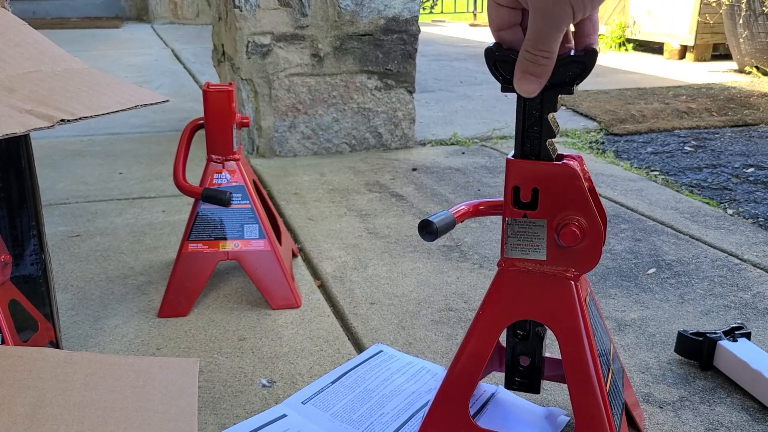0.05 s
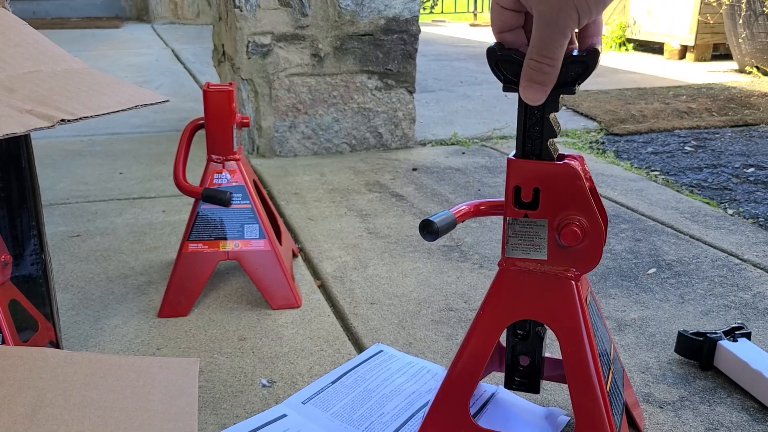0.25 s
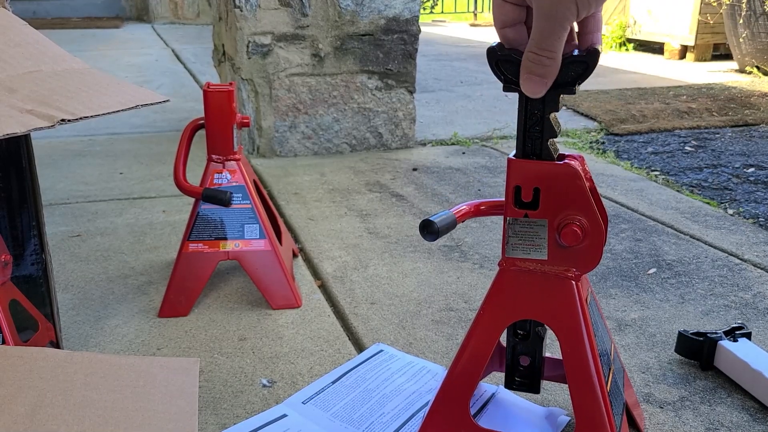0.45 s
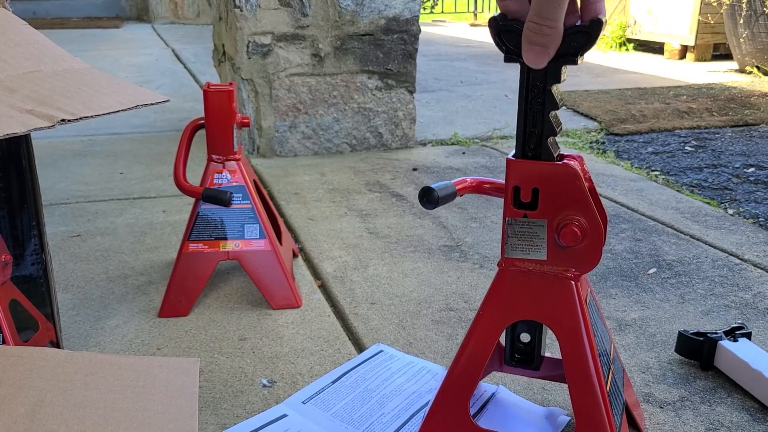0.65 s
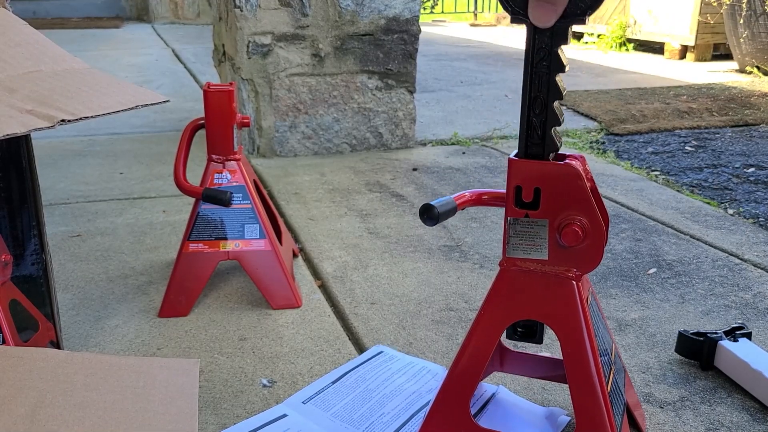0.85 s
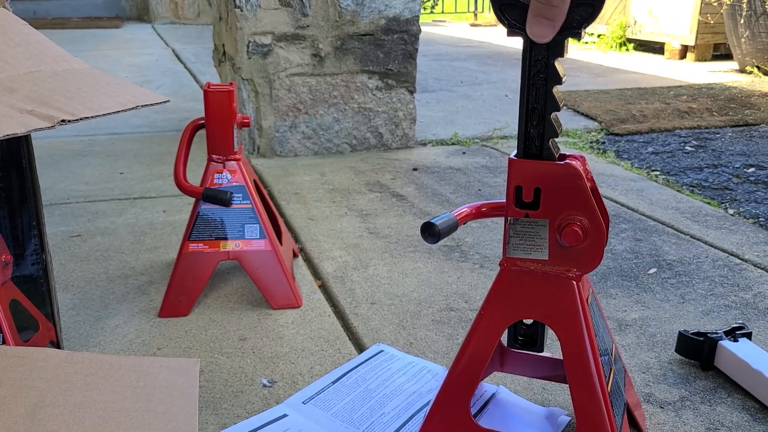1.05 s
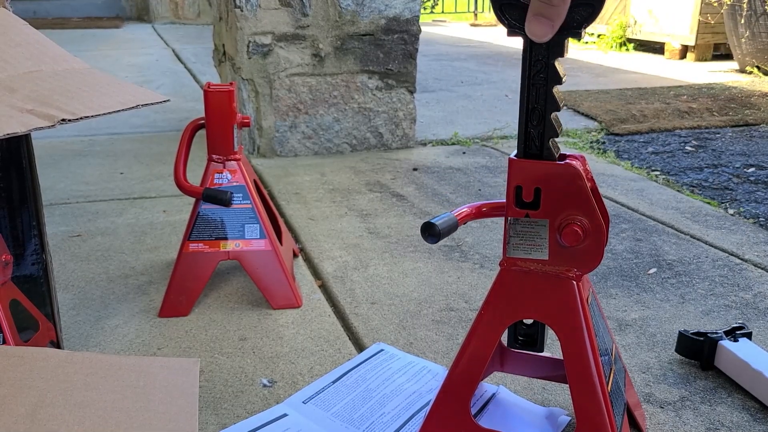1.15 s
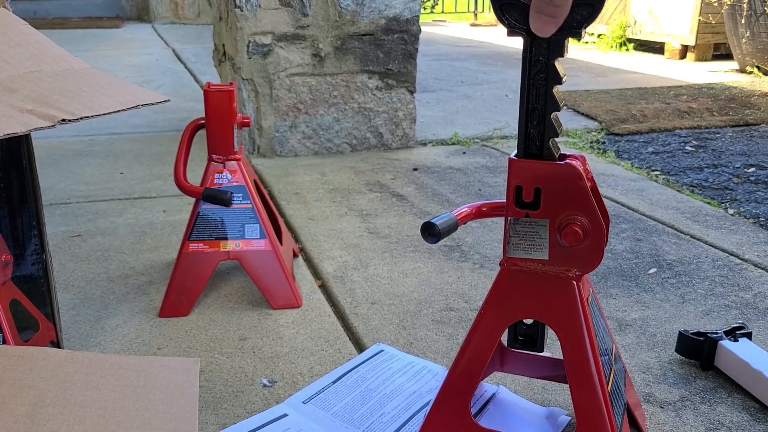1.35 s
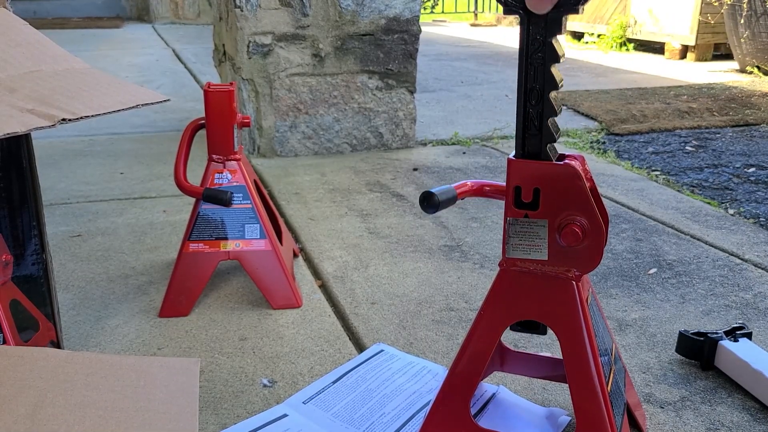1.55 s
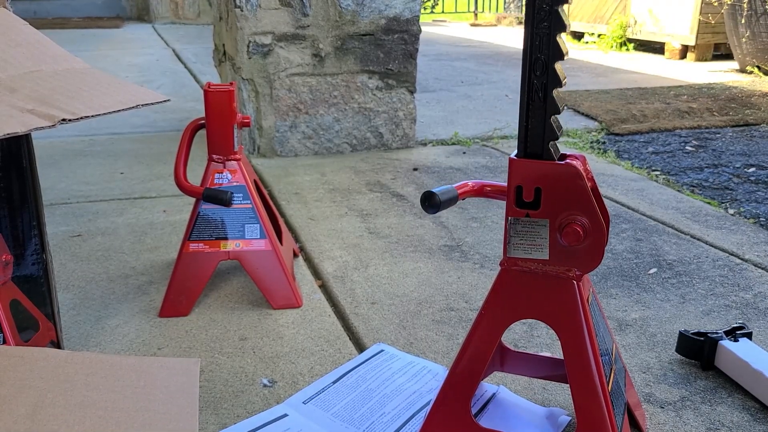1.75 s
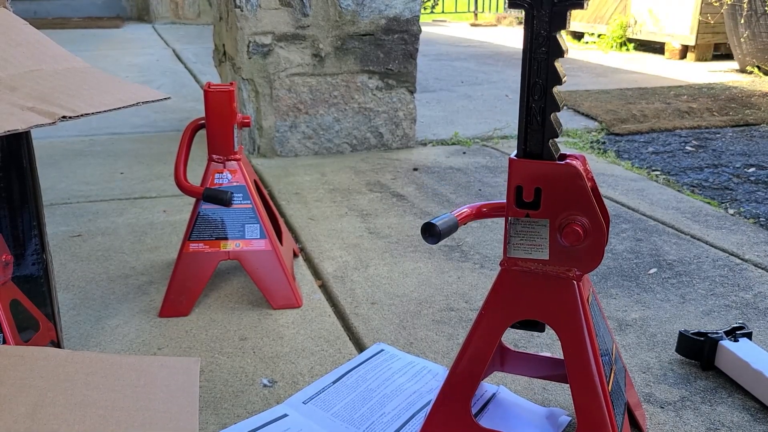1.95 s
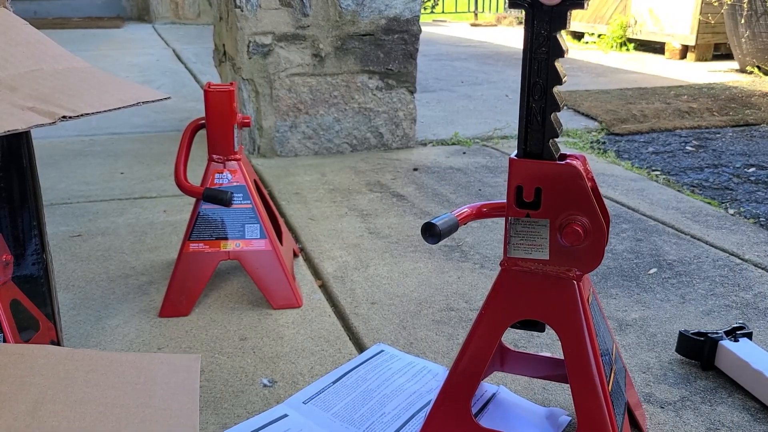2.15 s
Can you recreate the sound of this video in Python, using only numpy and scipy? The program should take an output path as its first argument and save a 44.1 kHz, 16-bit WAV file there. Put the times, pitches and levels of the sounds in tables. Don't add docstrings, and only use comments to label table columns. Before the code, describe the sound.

A steel jack stand's latch scrapes and clatters over teeth, drops with a bright clank, pauses, then clinks twice more, the last ringing out. Close phone microphone outdoors, with low wind rumble and faint distant traffic.

```python
import sys
import numpy as np
from scipy import signal
from scipy.fft import rfft, irfft
from scipy.io import wavfile
from scipy.ndimage import uniform_filter1d

SR = 44100
rng = np.random.default_rng(int(sys.argv[2]) if len(sys.argv) > 2 else 0)


def store_wav(level_fs):
    pcm = np.round(np.clip(np.atleast_2d(level_fs), -1, 1) * 32767)
    wavfile.write(sys.argv[1], SR, pcm.T.astype(np.int16))


def invert_db(x):
    u = np.asarray(x, float) / 20
    return 10 ** u


N = 97108

# start in seconds, handle
# level in dB, post level in dB, frame level in dB, bright edge level in dB.
KNOCKS = [(.500, -37, -42, -49.5, -87), (.527, -33, -65, -67, -85), (.552, -25, -32.5, -47.5, -88),
          (.591, -34, -32, -40, -62), (.612, -28.5, -51, -39, -61), (.657, -29, -57, -53, -76),
          (.689, -21.5, -18, -24, -48), (.720, -42, -23, -42, -51), (.756, -28.5, -28, -42, -75),
          (.783, -35, -16, -18.5, -36), (.800, -34, -15.5, -45, -50), (.892, -31, -31, -26, -55),
          (.897, -10.5, -22, -15.5, -43.5), (.963, -29.5, -74.5, -59, -89), (1.470, -39, -64, -59, -87.5),
          (1.483, -26, -50, -65, -89), (1.510, -24, -32.5, -44, -72), (1.545, -24, -44, -58, -73),
          (1.562, -51, -27, -36, -80), (1.6115, -22.5, -7, -20.5, -30.5), (1.695, -35, -48, -54, -77),
          (1.795, -61.5, -45.5, -42, -83), (1.817, -7.5, -13, -10, -26)]
LEFTOVER_S, LEFTOVER_DB = -0.11, (-13.5, -41, -13.5, -39)
# start in seconds, level in dB.
PAWL_TAPS = [
    (.503, -47.5),
    (0.612, -39),
    (0.696, -28),
    (0.786, -34),
    (0.895, -25.5),
    (1.561, -24.5),
    (1.615, -23),
    (1.818, -21.5),
]
# start in seconds, level in dB.
SEATINGS = [
    (-.09, -39),
    (.897, -36.5),
    (1.613, -37),
    (1.817, -20.5),
]
# start in seconds, level in dB.
ROCKS = [
    (0.549, -29.5),
    (0.609, -31.5),
    (.69, -34.5),
    (1.557, -24),
    (1.581, -30),
    (1.635, -24.5),
]
# start in seconds, level in dB.
HANDLE_BOUNCES = [
    (.703, -32),
    (.789, -17.5),
    (1.624, -20.5),
    (1.828, -16.5),
    (1.868, -33.5),
]
# start in seconds, level in dB.
TOOTH_TICKS = [(.553, -44.5), (.592, -40), (.618, -43), (.664, -36.5), (0.689, -29), (0.723, -27),
               (0.783, -23.5), (0.8, -15), (.899, -16), (1.512, -48), (1.561, -28), (1.6155, -9.5),
               (1.626, -17), (1.818, -10), (1.828, -19.5)]
PIN_TICKS = [(0.502, -52), (.553, -49), (.592, -44), (.615, -42), (.691, -30), (0.783, -27.5),
             (.899, -26.5), (1.507, -40.5), (1.614, -28), (1.818, -16.5), (1.832, -20.5)]

HANDLE_HZ = [829, 862, 889]
POST_HZ = [1066, 2320, 2468, 2500, 2732, 2830, 3752, 3995, 4334]
PAWL_HZ = [1662, 2056, 2172, 3098, 3140]
FRAME_HZ = [1744, 2266, 2815, 3174, 3300, 3354, 4221, 5100]
EDGE_HZ = [4651, 4743, 5669, 5809, 6029, 6562, 7084, 7700, 8640, 9172, 9354, 10420, 10670, 13880]
LEGS_HZ = [1997.5, 3541, 5812, 6390, 7434]
TOOTH_HZ = [2836, 5469]
PIN_HZ = [3655, 3754, 4511, 4904]
# level in dB, time to decay by 60 dB (T60) in seconds.
HANDLE = [(-6, 0.072), (-10, 0.23), (-6, 0.2)]
POST = [(-22.5, 0.16), (-45, 0.15), (-19, 0.21), (-28.5, 0.18), (-2.5, 0.16), (-18, 0.21), (-11, 0.13),
        (-37.5, 0.063), (-25, 0.22)]
PAWL = [(1, 0.2), (-15, 0.34), (-5.5, 0.039), (-9, 0.062), (-8, 0.057)]
FRAME = [(-9, 0.16), (-20, 0.22), (-2, 0.12), (-5.5, 0.17), (-10, 0.1), (-5, 0.14), (-26, 0.29),
         (-10, 0.041)]
EDGE = [(-10.5, .25), (-12, 0.26), (-9, 0.18), (-3.5, .28), (-7.5, 0.17), (-15, 0.27), (-9.5, 0.26),
        (-7, .17), (-13, 0.18), (-13.5, .11), (-13.5, .17), (-24, .15), (-22, 0.13), (-25, .12)]
LEGS = [(-1, 0.3829), (-6.5, 0.32), (-23.5, 0.52), (-38, 0.9), (-21, 0.29)]
TOOTH = [(4, .13), (-26, 0.076)]
PIN = [(-1, 0.11), (2, 0.11), (-9, 0.1), (-12.5, 0.25)]
# frequency in Hz, level in dB, T60 in seconds.
SHEET = [(458.1, -43.5, 0.048), (707, -25, 0.09), (1400, -13.5, 0.11), (2830, -8, 0.16), (4891, -22, 0.086)]
RIM = [(4010, -4, 0.19), (5900, -6.5, 0.17), (9000, -20.5, 0.17), (11000, -18, 0.23), (13300, -28, 0.19),
       (16100, -36, .07)]
HUM = [(835, -14, .12), (887.6, 0, .2)]
# low edge in Hz, high edge in Hz, level in dB, T60 in seconds.
THUD = (270, 610, 1.1, 0.11)
CLACK = (902.5, 5000.5, -4, 0.1038)
CRACK = (5200, 8200, -4, 0.014)
SPRAY = (4508.5, 14010, -14.5, 0.0932)
ROCK = (78, 560.5, 5.5, 0.09)

# time in seconds, level in dB.
DRAG = [(.45, -110), (.5, -69), (.6, -63.5), (.7, -48), (.82, -60), (.88, -65), (.98, -73.5), (1.04, -110),
        (1.43, -110), (1.49, -60.5), (1.6, -51.5), (1.68, -54), (1.76, -85), (1.8, -49.5), (1.86, -110)]
RUB = [(.47, -76), (.51, -45), (.62, -42), (.76, -42), (.84, -63), (1.0, -77), (1.44, -85), (1.48, -53),
       (1.55, -40.5), (1.6, -52), (1.72, -48.5), (1.78, -82)]
# handle, post, pawl, frame, edge, sheet, rim levels in dB.
DRAG_MIX_DB = (-0.5, -7.5, -8, -23, -23.5, -4.5, -34.5)
# frequency in Hz, difference in dB.
STEEL_PAN = [(300, -5), (600, -2), (880, 7), (1100, -5), (1900, -5), (2500, 1), (8000, 0), (15000, 2)]
# frequency in Hz, lead in radians.
STEEL_LEAD = [(300, .2), (880, .35), (1200, 1.1), (2800, 1.3), (4500, 1.5), (15000, 1.6)]

# frequency in Hz, density in dB per Hz.
TOWN = [(120, -40), (200, -8.5), (254, -6), (282, -2.5), (297, -12.5), (404, -12.5), (873, -14.5),
        (1290, -13), (3500, -30.5), (6500, -52), (12000, -60.5), (15600, -89), (22000, -120)]
WIND = [(11, -16.5), (18, -2.5), (47, 2.5), (70, 8), (98, 1.5), (161, -8.5), (300, -17.5), (390, -53.5),
        (660, -120)]
# time in seconds, level in dB.
TOWN_LEVEL = [(0.0, -55.5), (0.52, -53.5), (0.77, -45), (1.09, -53), (1.84, -56), (2.2, -59.5)]
GUST = [(0.08, -40.5), (0.41, -50.5), (0.5, -38.5), (0.63, -50.5), (0.65, -38), (0.93, -39.5),
        (0.96, -31.5), (1.13, -51.5), (1.18, -38.5), (1.21, -41.5), (1.5, -41), (1.51, -44), (1.63, -29),
        (1.74, -41.5), (1.83, -36.5), (2.17, -36)]

RING = 14000
RISE_CYCLES, PUSH_S = 1.5, 0.0022
SCATTER_DB, SWAY = 2, 0.59
FREE_S, MUFFLED_T60_S = 0.033, 0.085
CHATTER_S = 0.0017
THUD_PAN_DB, THUD_SIDE = -3.5, .3
ECHO_DB, ECHO_T60_S = -20, 0.3
TOWN_LIFT_DB, TOWN_SIDE_DB = 0.5, -2
WIND_SIDE_DB, FLUTTER_DB = -1.5, 2.5
CHIRP_S, CHIRP_LEN_S, CHIRP_HZ, CHIRP_DB = 1.16, .042, 2650, -56
TOP_HZ, CEILING, FADE_S = 16200, 1.1, .012


def steel():
    edge = rings(np.column_stack([EDGE_HZ, EDGE]), spread=3.)
    parts = [part(HANDLE_HZ, HANDLE), part(POST_HZ, POST), part(PAWL_HZ, PAWL), part(FRAME_HZ, FRAME),
             edge, crowd(SHEET, count=90), crowd(RIM, count=150)]
    return knocks(parts) + taps(parts[2]) + drag(parts)


def knocks(parts):
    handle, post, _, frame, edge, sheet, rim = parts
    out = np.zeros((2, N))
    for s, *levels_db in [(LEFTOVER_S, *LEFTOVER_DB), *KNOCKS]:
        to_handle, to_post, to_frame, to_edge = invert_db(levels_db)
        solid = to_handle * muffled(strike(handle)) + to_post * strike(post)
        solid = solid + to_frame * (strike(frame) + thud(THUD))
        add(out, s, solid)
        loose = to_frame * (strike(sheet) + burst(*CLACK))
        loose = loose + to_edge * (strike(edge) + strike(rim) + burst(*SPRAY))
        rattle = signal.fftconvolve(loose, chatter())
        crack = np.pad(burst(*CRACK), ((0, 0), (0, 799)))
        add(out, s, rattle + to_edge * crack)
    return out


def taps(pawl):
    out = np.zeros((2, N))
    for piece, events in ((pawl, PAWL_TAPS), (part(LEGS_HZ, LEGS), SEATINGS)):
        for s, db in events:
            add(out, s, invert_db(db) * strike(piece))
    return out


def drag(parts):
    body = sum(invert_db(db) * strike(p) for db, p in zip(DRAG_MIX_DB, parts))
    grit = rng.standard_normal(N) ** 3
    grit = grit * invert_db(curve(DRAG) + 6.8 * walk(58.68) - 21.5)
    return signal.fftconvolve(body, grit[None])[:, :N]


def rings(modes, spread=0.):
    hz, db, t60 = np.array(modes).T
    pan_db = on_log(STEEL_PAN, hz) + spread * rng.standard_normal(len(hz))
    lead = on_log(STEEL_LEAD, hz)
    ears = invert_db(np.outer(pan_db, [.5, -.5])) * np.exp(1j * np.outer(lead, [.5, -.5]))
    t = np.arange(RING) / SR
    rise = np.sin(np.pi / 2 * np.minimum(np.outer(hz, t) / RISE_CYCLES, 1)) ** 2
    decay = np.exp(np.outer(2j * np.pi * hz - np.log(1000) / t60, t))
    return invert_db(db)[:, None] * ears, (rise * decay).astype(np.complex64)


def part(hz, table):
    return rings(np.column_stack([hz, table]))


def crowd(table, count):
    luck = rng.random((count, 3))
    low, high = table[0][0], table[-1][0]
    hz = low + (high - low) * luck[:, 0] ** 1.3
    db = on_log(table, hz) - 8 * luck[:, 1]
    t60 = on_log(table, hz, col=2) * (.6 + .8 * luck[:, 2])
    return rings(np.array([hz, db, t60]).T, spread=3.)


def strike(piece):
    ears, ring = piece
    luck = rng.standard_normal((len(ring), 2))
    turn = 2 * luck[:, 1:] + SWAY * luck[:, :1] * [.5, -.5]
    weights = ears * invert_db(SCATTER_DB * luck[:, :1]) * np.exp(1j * turn)
    return (weights.T.astype(np.complex64) @ ring).imag


def muffled(sound):
    return sound * invert_db(-60 * np.maximum(np.arange(RING) / SR - FREE_S, 0) / MUFFLED_T60_S)


def burst(lo_hz, hi_hz, db, t60, width=0.84):
    mid, side = rng.standard_normal((2, RING))
    noise = mid + width * side * np.array([[1], [-1]])
    noise = noise * invert_db(db - 60 * np.arange(RING) / SR / t60)
    band = signal.butter(2, [lo_hz, min(hi_hz, 20000)], "band", fs=SR, output="sos")
    return signal.sosfilt(band, noise)


def thud(band):
    return burst(*band, width=THUD_SIDE) * invert_db(THUD_PAN_DB * np.array([[.5], [-.5]]))


def chatter():
    t = np.arange(800) / SR
    impacts = rng.standard_normal(len(t)) ** 3 * np.exp(-t / CHATTER_S)
    return (impacts / np.linalg.norm(impacts))[None]


def add(out, s, sound):
    i = int(round(s * SR))
    push = np.minimum(np.arange(sound.shape[1]) / SR / PUSH_S, 1)
    piece = (sound * push)[:, max(-i, 0):N - i]
    out[:, max(i, 0):max(i, 0) + piece.shape[1]] += piece


def small_parts():
    return ticks(TOOTH_HZ, TOOTH, TOOTH_TICKS) + ticks(PIN_HZ, PIN, PIN_TICKS) + rocking() + handle_motion()


def ticks(hz, modes, events):
    piece = part(hz, modes)
    out = np.zeros((2, N))
    for (s, db), (next_s, _) in zip(events, [*events[1:], (N / SR, 0)]):
        gripped = np.clip((next_s - s + PUSH_S - np.arange(RING) / SR) / PUSH_S, 0, 1)
        add(out, s, invert_db(db) * strike(piece) * gripped)
    return out


def rocking():
    out = np.zeros((2, N))
    for s, db in ROCKS:
        add(out, s, invert_db(db) * thud(ROCK))
    return out


def handle_motion():
    handle = part(HANDLE_HZ, HANDLE)
    hum = strike(rings(HUM))
    rub = rng.standard_normal(N) * invert_db(curve(RUB)) / np.linalg.norm(hum[0])
    out = signal.fftconvolve(hum, rub[None])[:, :N]
    for s, db in HANDLE_BOUNCES:
        add(out, s, invert_db(db) * muffled(strike(handle)))
    return out


def echo(jack):
    t = np.arange(RING // 2) / SR
    response = rng.standard_normal((2, len(t))) * invert_db(-60 * t / ECHO_T60_S) * (t > .003)
    response = response / np.linalg.norm(response[0])
    return invert_db(ECHO_DB) * signal.fftconvolve(jack.mean(0)[None], response)[:, :N]


def wind():
    flutter = FLUTTER_DB * np.array([walk(14.47), walk(42.18)])
    spectrum = [*WIND, (500, -78.5)]
    return coloured(spectrum, WIND_SIDE_DB) * invert_db(curve(GUST) + flutter)


def town():
    return coloured(TOWN, TOWN_SIDE_DB) * invert_db(curve(TOWN_LEVEL) + TOWN_LIFT_DB + 0.29 * walk(13))


def bird():
    u = (np.arange(N) / SR - CHIRP_S) / CHIRP_LEN_S
    swell = np.sin(np.pi * np.clip(u, 0, 1))
    return invert_db(CHIRP_DB) * swell * np.sin(2 * np.pi * CHIRP_HZ * CHIRP_LEN_S * u)


def coloured(table, side_db):
    hz = np.maximum(np.fft.rfftfreq(N, 1 / SR), 1)
    shape = invert_db(on_log(table, hz)) * (hz > table[0][0])
    mid, side = irfft(rfft(rng.standard_normal((2, N))) * shape, N)
    return (mid + invert_db(side_db) * side * np.array([[1], [-1]])) / mid.std()


def walk(rate):
    k = int(SR / rate)
    steps = np.repeat(rng.standard_normal(N // k + 1), k)
    return 1.3 * uniform_filter1d(uniform_filter1d(steps, k), k)[:N]


def curve(table):
    return np.interp(np.arange(N) / SR, *np.array(table).T[:2])


def on_log(table, hz, col=1):
    table = np.array(table)
    return np.interp(np.log(hz), np.log(table[:, 0]), table[:, col])


def scene():
    jack = steel() + small_parts()
    return jack + echo(jack) + wind() + town() + bird()


def top_cut(x):
    return signal.sosfilt(signal.butter(12, 16480, fs=SR, output="sos"), x)


def record(dry):
    rounded = CEILING * np.tanh(dry / CEILING)
    low_pass = signal.ellip(8, .2, 70, TOP_HZ, fs=SR, output="sos")
    cut = signal.sosfilt(low_pass, rounded)
    fade = np.clip((N - np.arange(N)) / SR / FADE_S, 0, 1)
    return top_cut(cut * fade)


dry = scene()
out = record(dry)
store_wav(out)
```